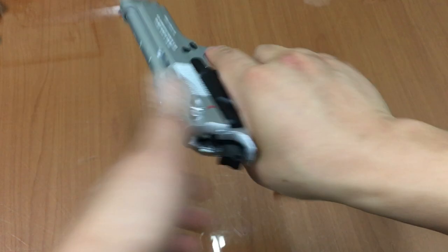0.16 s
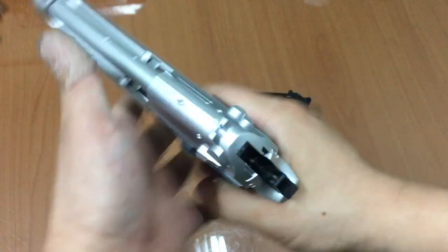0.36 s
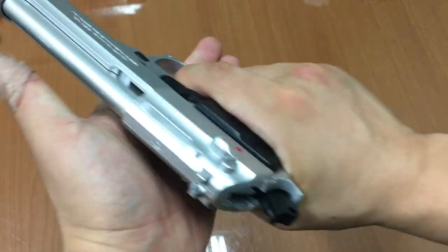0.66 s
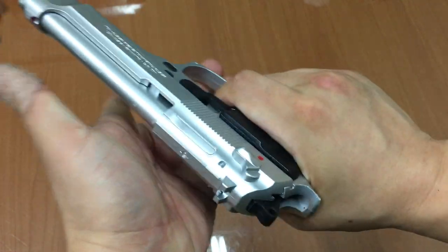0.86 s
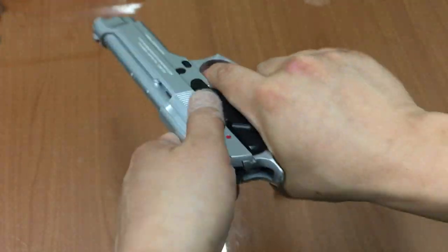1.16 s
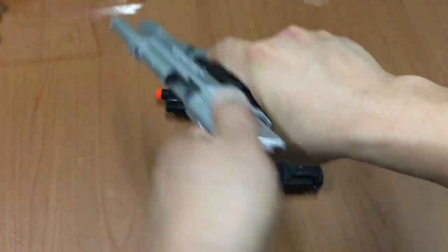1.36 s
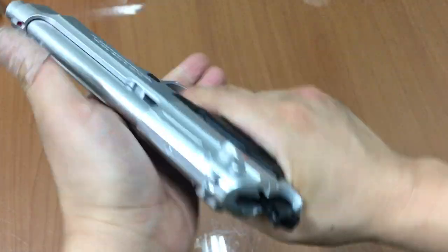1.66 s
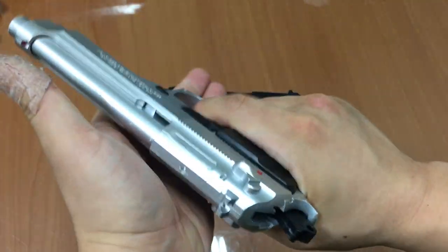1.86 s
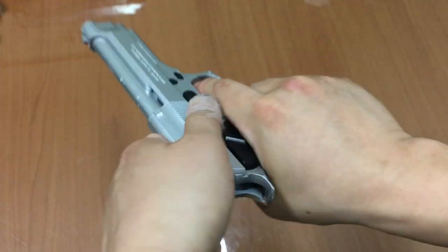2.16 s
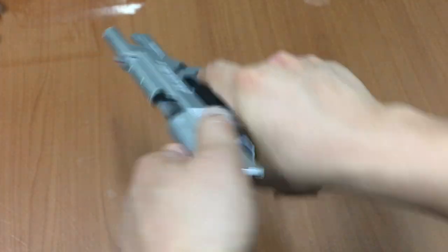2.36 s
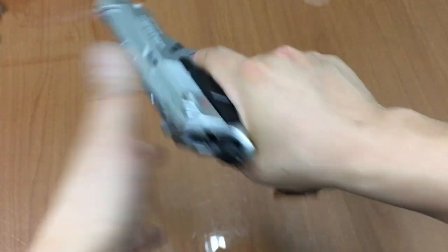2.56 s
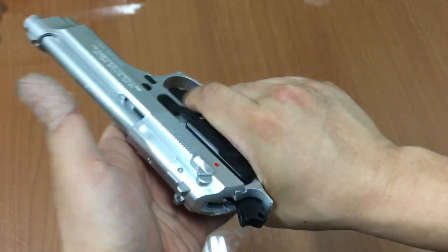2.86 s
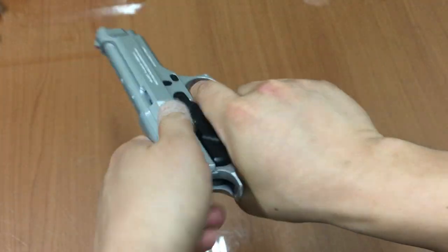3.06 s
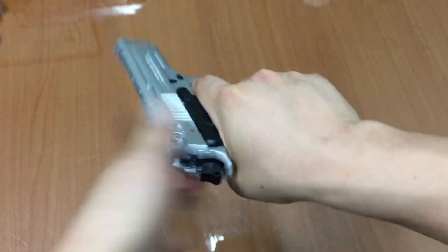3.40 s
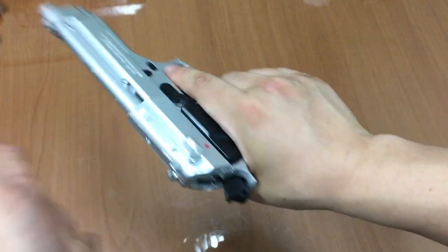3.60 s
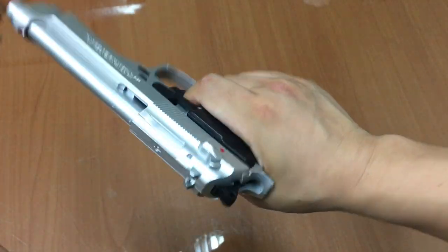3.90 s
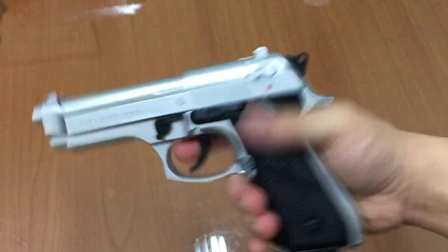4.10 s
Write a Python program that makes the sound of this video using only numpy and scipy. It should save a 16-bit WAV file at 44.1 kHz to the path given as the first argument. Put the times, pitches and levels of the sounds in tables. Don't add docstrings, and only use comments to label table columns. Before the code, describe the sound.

Four quick cycles of an airsoft-style pistol: a gritty pull with a catch snap and rear-stop knock, a bright ringing slam as the slide returns, then a woody, clattering piston snap. Soft trigger returns and finger ticks fill the gaps. The sound is near and dry, with short bright room echoes and faint rumble that dips after loud blows.

```python
import sys
import numpy as np
from scipy import signal
from scipy.fft import rfft, irfft, next_fast_len
from scipy.io import wavfile
from scipy.ndimage import map_coordinates

SR = 44100
rng = np.random.default_rng(int(sys.argv[2]) if len(sys.argv) > 2 else 0)


def invert_db(level):
    return 10 ** (np.asarray(level, dtype=float) / 20)


def store_pcm(level_fs):
    pcm = np.round(np.clip(level_fs, -1, 1) * 32767).astype(np.int16)
    wavfile.write(sys.argv[1], SR, np.atleast_2d(pcm).T)


N = 187067


def unit(x):
    return x / np.sqrt(np.mean(x ** 2) + 1e-20)


def along(points, hz):
    f, v = np.transpose(points)
    return np.interp(np.log(hz + 1), np.log(f + 1), v)


def filtered(x, response):
    m = next_fast_len(N + SR // 2)
    return irfft(rfft(x, m) * response(np.fft.rfftfreq(m, 1 / SR)), m)[..., :N]


def noise(spectrum):
    return unit(filtered(rng.standard_normal(N), lambda hz: invert_db(along(spectrum, hz))))


def wobble(rate):
    knots = rng.standard_normal(int(N * rate / SR) + 4)
    return map_coordinates(knots, [np.arange(N) * rate / SR])


# hz, density_db
AIR_SPECTRUM = [(35, -27), (60, -2.5), (163, -0.5), (299, -9), (471, -19), (729, -23.5), (852, -24.5),
                (1200, -26.5), (1750, -31), (1890, -34.5), (2500, -42), (3250, -79.5), (5500, -120)]
# hz, density_db
HISS_SPECTRUM = [(1200, -5), (2500, -4), (5000, -6.5), (9000, -13), (13000, -15.5)]
# at_s, level_db
DRONE_LEVEL = [(0.0, -51.5), (3.7, -61), (3.85, -52), (3.92, -56), (4.24, -48)]
# at_s, level_db
HISS_LEVEL = [(0.3, -53), (0.666, -62), (0.88, -67), (1.7, -58.5), (1.97, -62.5), (2.8, -51), (2.97, -58.5),
              (3.7, -57), (4.24, -53.5)]


def ventilation():
    t = np.arange(N) / SR
    waver = invert_db(3 * wobble(12))
    fan = invert_db(-52.5) * waver * np.sin(2 * np.pi * 300 * t)
    drone_spectrum = [(20, -25.5), (40, -10), (51, 4.0), (60, -7.5), (80, -28), (200, -120)]
    drone = invert_db(np.interp(t, *np.transpose(DRONE_LEVEL)) + 11) * noise(drone_spectrum)
    hiss = invert_db(np.interp(t, *np.transpose(HISS_LEVEL)) - 4.0) * noise(HISS_SPECTRUM)
    rumble = invert_db(-39.5 + 2.13 * wobble(2.73)) * noise(AIR_SPECTRUM)
    return rumble + fan + drone + hiss


def slope(stop, db, db_per_s, until):
    t = np.arange(N) / SR
    between = (t - stop) * (until - t) > 0
    return invert_db(db - db_per_s * np.abs(t - stop)) * between


# hz, density_db
RAIL_SPECTRUM = [(700, -16.5), (1700, 1), (2400, -4), (3200, -2.5), (4500, -10.5), (7000, -9), (11000, -16),
                 (16000, -24)]
# before_catch_db, after_catch_db, before_rear_db, after_rear_db, before_landing_db
RUB = [
    (-31.5, -16.5, -48, -29.5, -35.5),
    (-43.5, -25, -11, -38.5, -35),
    (-41, -30, -20, -53, -33.5),
    (-41, -21, -18, -27.5, -37.5),
]
LET_GO_DB = [-55.5, -47.5, -60, -74, -45]


def scrape():
    reach_s = 0.2
    surge_db, surge_s = 10.5, 0.0033
    level = np.zeros(N)
    for (catch, *_), (rear, *_), (home, *_), rub in zip(CATCH, REAR, HOME, RUB):
        to_catch, from_catch, to_rear, from_rear, to_home = rub
        level += slope(catch, to_catch, 147, catch - reach_s)
        level += slope(catch, from_catch, 894, rear)
        level += slope(rear, to_rear, 1101, catch)
        level += slope(rear, from_rear, 349.5, home)
        level += slope(home, to_home, 169, rear)
        for stop, db in ((catch, to_catch), (home, to_home)):
            level += slope(stop, db + surge_db, surge_db / surge_s, stop - reach_s)
    for (reset, *_), db in zip(RESET, LET_GO_DB):
        level += slope(reset, db, 123, reset + reach_s)
    grain = invert_db(4 * wobble(300) + 3 * wobble(35))
    return invert_db(-7.5) * level * unit(noise(RAIL_SPECTRUM) * grain)


def played(times, steps, ring_db=None, heft_db=None):
    ring_db = ring_db or [0] * len(times)
    heft_db = heft_db or [0] * len(times)
    rows = []
    for (s, db, pace, hard_db, chatter_ms), ring, heft in zip(times, ring_db, heft_db):
        for ms, grip, frame, slide, crack in steps:
            part_db = (grip + db + heft, frame + db, slide + db + ring, crack + db + hard_db)
            rows.append((s + pace * ms / 1000, *part_db, chatter_ms))
    return rows


def small(times, step, chatter_ms=2.5):
    return played([(s, db, 1, hard_db, chatter_ms) for s, db, hard_db in times], step)


def contacts(rows, rattle, rise):
    blows, force = np.zeros((4, N)), np.zeros((4, N + SR))
    t = np.arange(SR // 50) / SR
    for s, *part_db, ms in rows:
        size, at = invert_db(np.array(part_db)), round(s * SR)
        chatter = rng.standard_normal((4, len(t))) * invert_db(7.8 * rng.standard_normal(len(t)))
        chatter *= (1 - np.exp(-t / rise)) * np.exp(-t * 1000 / np.clip(ms, 0.2, 6))
        chatter /= np.linalg.norm(chatter, axis=1, keepdims=True)
        force[:, at:at + len(t)] += size[:, None] * chatter
        blows[:, at + int(rise * SR)] += size * rng.choice([-1, 1])
    share = np.clip(rattle, 0, 1)[:, None]
    return blows, np.sqrt(1 - share) * blows + np.sqrt(share) * force[:, :N]


def resonances(modes):
    area = sum(invert_db(db) * width for _, width, db in modes) * 2 * np.pi / SR

    def response(hz):
        total = 0
        for k, (centre, width, db) in enumerate(modes):
            damping = 1j * hz * width
            total = total + (-1) ** k * invert_db(db) * damping / (centre * centre - hz * hz + damping)
        return total / area
    return response


# hz, width_hz, level_db
GRIP = [(644, 141, -9), (748, 67, -1.5), (1220, 596, -8)]
# hz, width_hz, level_db
CRACK = [(4150, 1890, -3), (5920, 1190, 3.5), (6597, 1170, 3.5), (8980, 820, -3.5), (9680, 190, 0),
         (12140, 3400, -9.5), (15000, 810, -11)]
# hz, width_hz, level_db
BARREL = [(3087, 17, -2.5), (3276, 29, 5.5), (3356, 9.5, -6.5), (3095, 12, -6.5)]


def gun(force, frame_modes, slide_modes, barrel_db):
    grip, frame, slide, shell = force
    body = invert_db(15) * filtered(grip, resonances(GRIP))
    body += invert_db(13.0) * filtered(frame, resonances(frame_modes))
    body += invert_db(13.5) * filtered(slide, resonances(slide_modes))
    body += invert_db(18) * filtered(shell, resonances(CRACK))
    return body + invert_db(barrel_db) * filtered(slide, resonances(BARREL))


def action(rows, rattle, parts, rise, barrel_db, room_db):
    blows, force = contacts(rows, rattle, rise)
    direct = gun(force, *parts, barrel_db)
    return np.array([direct, invert_db(room_db) * gun(blows, *parts, barrel_db)])


# hz, width_hz, level_db
FRAME_HELD = [(1714, 345, -1.5), (1914, 182, 3), (2490, 415, -3.5)]
# hz, width_hz, level_db
SLIDE_HELD = [(2940, 450, 1), (3390, 890, 1)]
# start_s, strength_db, pace, hardness_db, chatter_ms
CATCH = [
    (0.0112, 0, 0.96, -2, 0.6),
    (1.3431, -3, 1.73, -0.5, 0.88),
    (2.3891, -5.5, 1.1, -1, 1.6),
    (3.2986, -1.5, 1.54, 0.5, 1.3),
]
# offset_ms, grip_db, frame_db, slide_db, crack_db
CATCH_STEPS = [
    (-2.5, -57.5, -24, -45, -21),
    (0, -45, -14.5, -11.5, -13),
    (7.5, -56, -35.5, -43.5, -37),
]
# start_s, strength_db, pace, hardness_db, chatter_ms
REAR = [
    (0.058, -0.67, 1.07, -0.92, 4.4),
    (1.3897, 1, 0.68, 0.89, 2.6),
    (2.47, 0.11, 1.05, -0.65, 2.7),
    (3.3391, -1, .98, -0.7, 2.4),
]
# offset_ms, grip_db, frame_db, slide_db, crack_db
REAR_STEPS = [
    (-4, -51.5, -22, -15, -17),
    (0, -32, -15.5, -11.5, -4.5),
]
GRIPPED_DB = [-2.5, 3, -1, 0]
# start_s, strength_db, hardness_db
CREAK = [(0.0435, -43, 18.5), (0.1768, -34, -1), (0.183, -42, -5.5), (0.1922, -30, 0), (1.2766, -38.5, -29),
         (1.3225, -49, 13), (1.356, -36, 8.5), (1.3725, -38, 16.5), (1.38, -38.5, 6.5), (2.2939, -49, -12),
         (2.3155, -39.5, -28), (2.3573, -39, -23), (2.3775, -33, -1), (2.4164, -26.5, -21),
         (2.4565, -39, 13), (3.2528, -48, -19), (3.272, -44, -13), (3.4359, -32, -1)]
# offset_ms, grip_db, frame_db, slide_db, crack_db
CREAK_STEP = [(0.0023, -17.5, 0.5, -15, 0.5)]
# start_s, strength_db, hardness_db
PING = [
    (1.3037, -31, -9),
    (2.3373, -47, -5),
    (2.4491, -22, 1),
]
# offset_ms, grip_db, frame_db, slide_db, crack_db
PING_STEP = [(0.019, -19, -12.5, -3, -3)]


def slide_pulled():
    rows = played(CATCH, CATCH_STEPS) + played(REAR, REAR_STEPS, GRIPPED_DB)
    rows += small(CREAK, CREAK_STEP) + small(PING, PING_STEP)
    return action(rows, [0.76, 0.11, 0.32, 0.42], (FRAME_HELD, SLIDE_HELD),
                  rise=0.0002, barrel_db=-23.5, room_db=-13.0)


# hz, width_hz, level_db
FRAME_SLAM = [(1329, 110, -3.5), (1870, 320, -3.5), (2630, 180, -3.5)]
# hz, width_hz, level_db
SLIDE = [(2977, 460, -9.5), (3205, 105, 7), (3290, 163, 3.5), (3810, 890, -23.5)]
# start_s, strength_db, pace, hardness_db, chatter_ms
HOME = [
    (0.2272, 0.74, 0.77, -0.4, 7),
    (1.529, 0.5, 1.2, 0.32, 2.1),
    (2.6074, 1, 0.54, 1.5, 4.3),
    (3.4868, 0.39, 0.88, 0.95, 8),
]
# offset_ms, grip_db, frame_db, slide_db, crack_db
HOME_STEPS = [
    (-12.5, -58, -42, -37, -28.5),
    (-8, -45.5, -52, -30, -37),
    (0, -46.5, -18, -5.5, -5.5),
]
# start_s, strength_db, pace, hardness_db, chatter_ms
LOCK = [
    (0.2439, -0.087, 1.03, -1.1, 4.4),
    (1.5466, 0.5, 1.05, 0.26, 2.1),
    (2.621, 0.82, 1.1, 0.41, 5),
    (3.4981, 0.31, 1.0, 0.61, 2.4),
]
# offset_ms, grip_db, frame_db, slide_db, crack_db
LOCK_STEPS = [
    (-4.5, -43.5, -23, -12.5, -10.5),
    (0, -30, -20.5, -36, -1.5),
    (4.5, -37, -21.5, -29, -9),
    (13.5, -55.5, -43.5, -36.5, -16),
    (28.5, -51.5, -40.5, -20, -32),
]
# start_s, strength_db, hardness_db
STRAY = [
    (0.2377, -20.5, 14),
    (2.6571, -16.5, 2.5),
    (3.4838, -13, 3),
    (3.49, -9.5, 3),
]
# offset_ms, grip_db, frame_db, slide_db, crack_db
STRAY_STEP = [(0, -28, -31.5, 0.5, 0.5)]


def slide_slams():
    rows = played(HOME, HOME_STEPS) + played(LOCK, LOCK_STEPS)
    rows += small(STRAY, STRAY_STEP, chatter_ms=11)
    return action(rows, [1.0, 0.88, 0.08, 1.0], (FRAME_SLAM, SLIDE),
                  rise=0.0002, barrel_db=-7.0, room_db=-3.5)


# middle_s, level_db
THUMP = [
    (0.243, -29.5),
    (0.91, -21.5),
    (1.392, -37),
    (1.548, -29),
    (2, -26.5),
    (2.623, -30),
    (3.004, -24),
    (3.497, -27.5),
    (3.9, -22.5),
]


def recoil():
    push, t = np.zeros(N), np.arange(N) / SR
    for s, db in THUMP:
        u = (t - s) / 0.0019
        push += invert_db(db) * np.sin(1.7 * u) * np.exp(-u * u / 2)
    return push


# start_s, strength_db, pace, hardness_db, chatter_ms
RESET = [
    (0.4767, 10, 0.78, -18.5, 1.4),
    (1.098, 2.5, 1.0, -6, 2),
    (2.176, -6.5, 1.3, 1, 1.8),
    (3.139, -4, 0.95, -4, 3.3),
    (4.0822, -3.5, 1.36, -0.5, 1.9),
]
# offset_ms, grip_db, frame_db, slide_db, crack_db
RESET_STEPS = [
    (0, -48, -34.5, -56.5, -13.5),
    (4, -54, -44, -43, -25.5),
    (17.5, -50, -54.5, -59, -32.5),
]
# start_s, strength_db, hardness_db
FIDGET = [(0.4812, -36.5, 11), (0.5245, -58, 4.5), (0.5365, -46.5, 9.5), (0.58, -51, 4), (0.638, -58, 6),
          (0.6508, -54, -2), (0.6953, -51, 3), (0.7111, -54, 1), (0.7559, -54, -9), (0.8566, -51, 4),
          (2.934, -47, -8), (2.9483, -56, 7), (3.8424, -63, 5), (3.8577, -55, 18), (3.8625, -53, 11),
          (3.879, -39, 9), (4.2074, -47, 5)]
# offset_ms, grip_db, frame_db, slide_db, crack_db
FIDGET_STEP = [(0, -5, 0.5, -4, 0.5)]


def trigger_and_fingers():
    rows = played(RESET, RESET_STEPS) + small(FIDGET, FIDGET_STEP)
    return action(rows, [0.68, 1.0, 1.0, 1.0], (FRAME_HELD, SLIDE_HELD),
                  rise=0.0005, barrel_db=-29.5, room_db=-7)


# hz, width_hz, level_db
FRAME = [(1250, 46, -11.5), (1485, 227, -5.5), (1686, 100, 1.5), (2220, 1130, -11)]
# start_s, strength_db, hardness_db
SEAR = [
    (0.88, -7, -4),
    (0.8831, -2, -0.5),
    (0.895, -3, -21.5),
    (1.974, -2, 1),
    (1.985, 3.5, 5),
    (2.9793, 0, 1.5),
    (3.874, -4, 0),
    (3.8851, 1.5, -1),
]
# offset_ms, grip_db, frame_db, slide_db, crack_db
SEAR_STEPS = [(0.026, -45, -36, -40, -30.5)]
# start_s, strength_db, pace, hardness_db, chatter_ms
PISTON = [
    (0.902, 0.6, .9, 0.19, 8.4),
    (1.9945, 0.97, 1.05, -0.71, 0.73),
    (3.0004, 1, 1.0, -0.51, 3.1),
    (3.893, -0.92, 1.15, 1, 2.9),
]
# offset_ms, grip_db, frame_db, slide_db, crack_db
PISTON_STEPS = [
    (0, -38, -9, -34.5, -8),
    (2.3, -15, -10.5, -22, -8.5),
    (4.5, -20.5, -13.5, -17, -6),
    (8, -21.5, -32.5, -17.5, -3.5),
    (12, -29.5, -13.5, -18, -19),
]
# start_s, strength_db, pace, hardness_db, chatter_ms
BOUNCE = [
    (0.922, 0.021, .92, -0.5, 2.5),
    (2.016, 0.18, 0.99, -4, 0.59),
    (3.02, 0.5, 1.02, 0.5, 1.6),
    (3.9141, -2.3, 1.08, 21.5, 1.8),
]
# offset_ms, grip_db, frame_db, slide_db, crack_db
BOUNCE_STEPS = [
    (0, -22.5, -13, -12.5, -28.5),
    (9.88, -27.5, -15, -21.5, -41.5),
    (26, -36, -22.5, -15, -39.5),
]
RING_DB = [-7, -4, -6, -2]
HEFT_DB = [-1.5, -2, -5, -0.5]


def shots():
    rows = small(SEAR, SEAR_STEPS, chatter_ms=7.2)
    rows += played(PISTON, PISTON_STEPS, RING_DB, HEFT_DB) + played(BOUNCE, BOUNCE_STEPS, RING_DB)
    return action(rows, [0.62, 0.42, 1.0, 0.56], (FRAME, SLIDE),
                  rise=0.0002, barrel_db=-20.5, room_db=-4)


# hz, t60_s
WALLS = [(300, 0.19), (1000, 0.19), (2500, 0.29), (5000, 0.32), (9000, 0.3), (15000, 0.19)]
# hz, level_db
WALL_COLOUR = [(300, 3.5), (1000, -2.2), (1700, -1.3), (3200, -1), (6000, -2.5), (10000, -3.5), (15000, 2)]


def room(x):
    wet, step = np.zeros(N + 2 * SR), int(0.2 * SR)
    for start in range(0, N, step):
        hz, t, z = signal.stft(rng.standard_normal(3 * SR // 4), SR, nperseg=256)
        t60 = along(WALLS, hz)[:, None]
        late = invert_db(-28.0 - 60 * t / (2.82 * t60))
        tail = signal.istft(z * (invert_db(-60 * t / t60) + late), SR, nperseg=256)[1]
        tail *= 1 - np.exp(-np.arange(len(tail)) / (0.0012 * SR))
        piece = signal.fftconvolve(x[start:start + step], tail / np.linalg.norm(tail))
        wet[start:start + len(piece)] += piece
    return filtered(wet[:N], lambda hz: invert_db(along(WALL_COLOUR, hz)))


def ducking(x, depth_db, release):
    t = np.arange(SR) / SR
    memory = np.exp(-t / release) / (release * SR)
    loudness = np.abs(signal.fftconvolve(x ** 2, memory)[:N])
    return invert_db(-depth_db * loudness / (loudness + invert_db(-55.5)))


def scene():
    handling = slide_pulled() + slide_slams() + shots() + trigger_and_fingers()
    near, outward = handling + scrape()
    air = ducking(near, depth_db=10, release=0.075) * ventilation()
    return (near + recoil() + room(outward) + air)[None]


def low_pass(x):
    return signal.sosfilt(signal.butter(12, 16810, fs=SR, output="sos"), x)


def record(dry):
    cut = filtered(dry, lambda hz: 1j * hz / (30 + 1j * hz))
    held = cut / (1 + np.abs(cut / 0.76) ** 6) ** (1 / 6)
    edge = [(15700, 0), (16000, -24), (16700, -30), (17000, -70)]  # hz, level_db
    mix = filtered(held, lambda hz: invert_db(along(edge, hz)))
    return low_pass(mix)


dry = scene()
out = record(dry)
store_pcm(out)
```